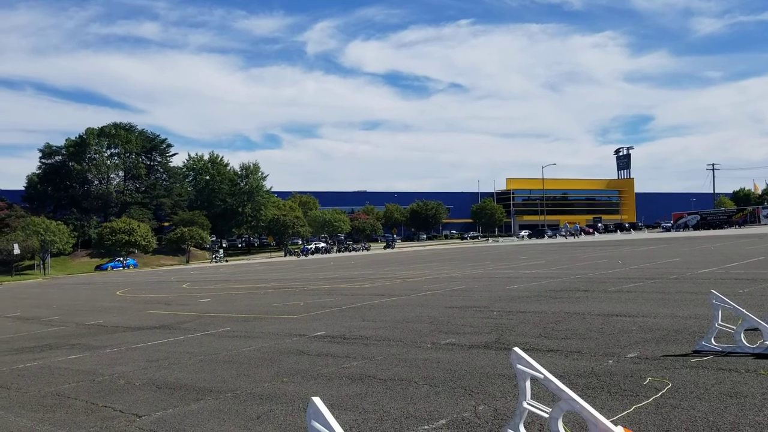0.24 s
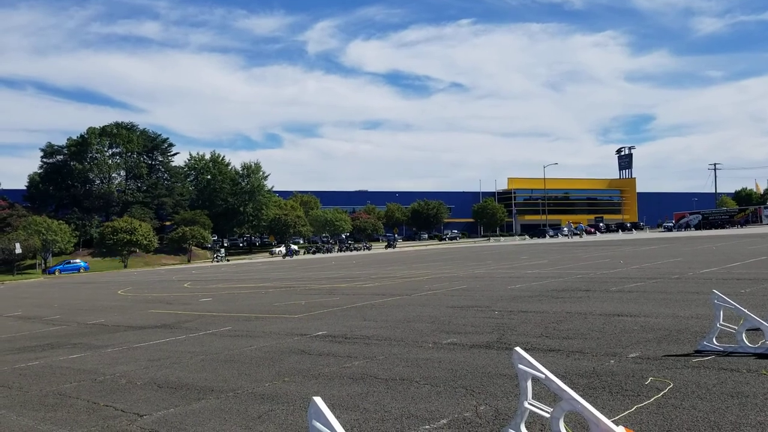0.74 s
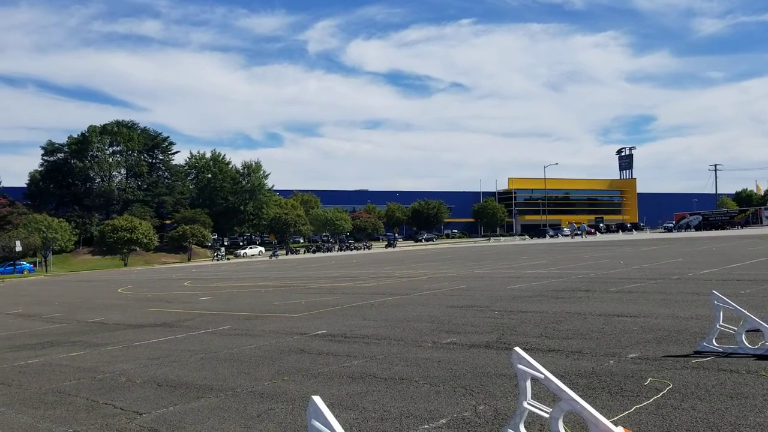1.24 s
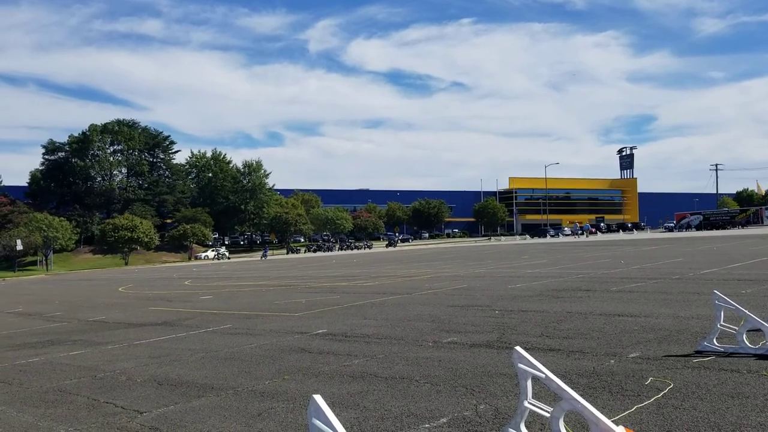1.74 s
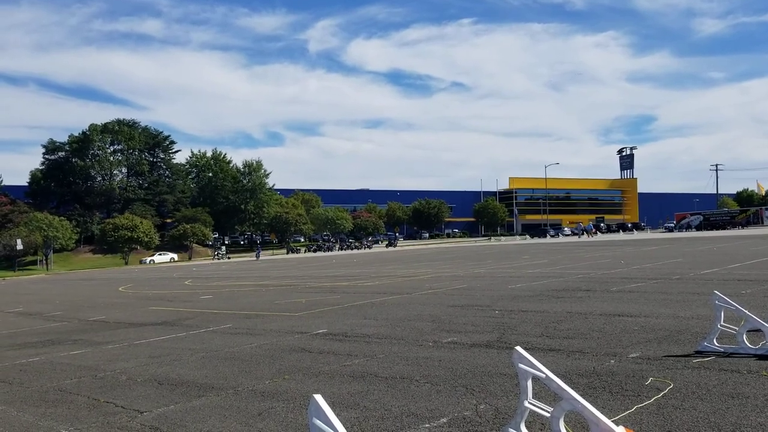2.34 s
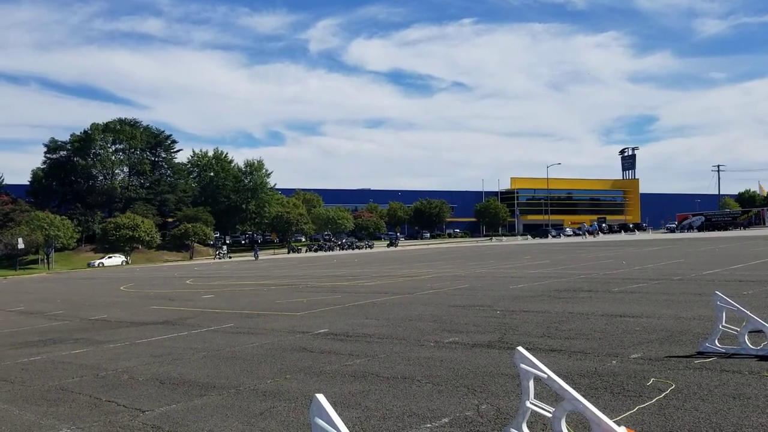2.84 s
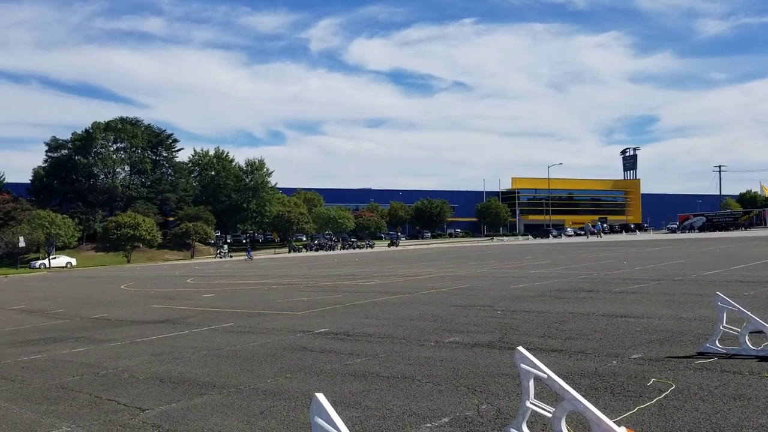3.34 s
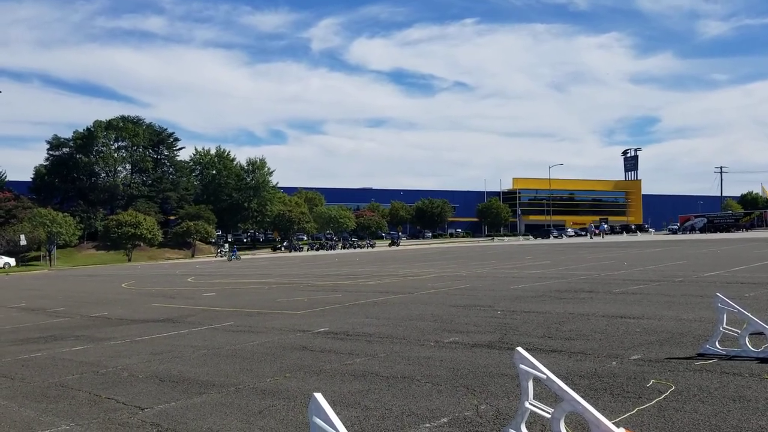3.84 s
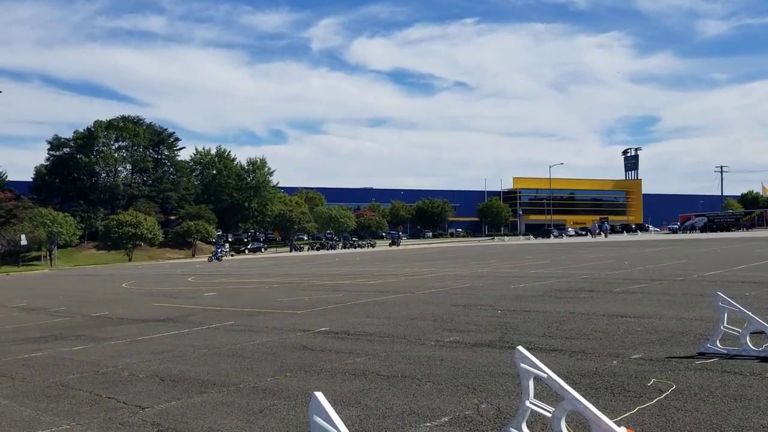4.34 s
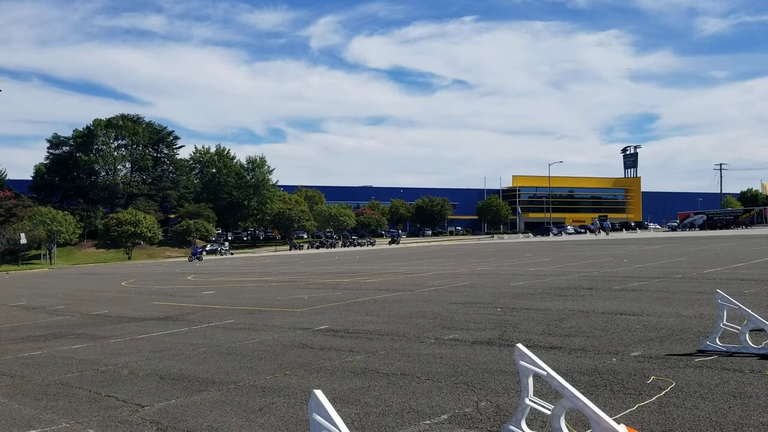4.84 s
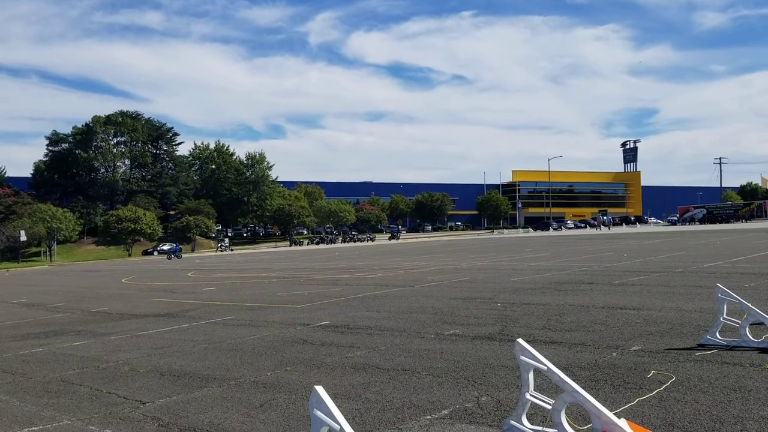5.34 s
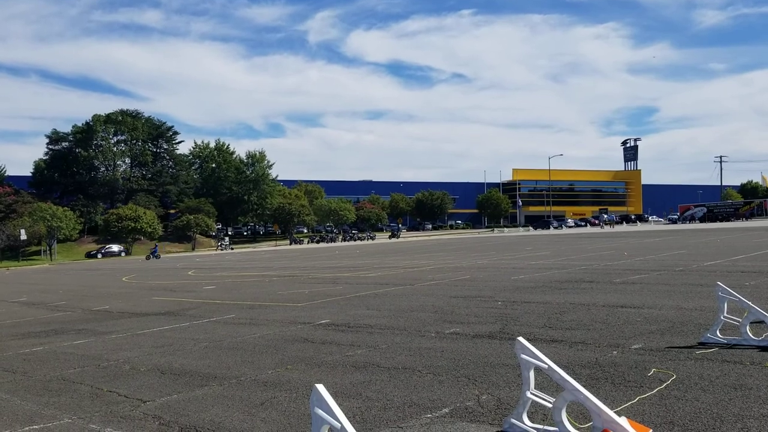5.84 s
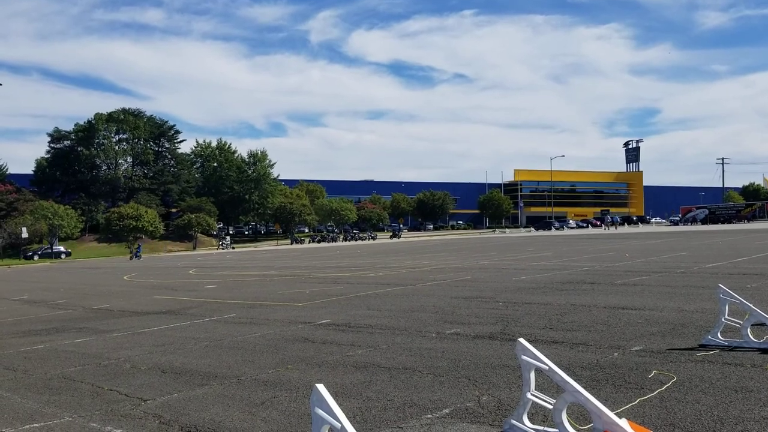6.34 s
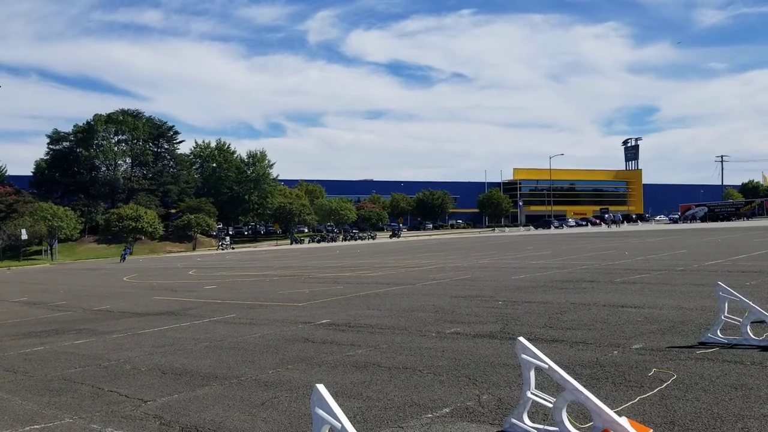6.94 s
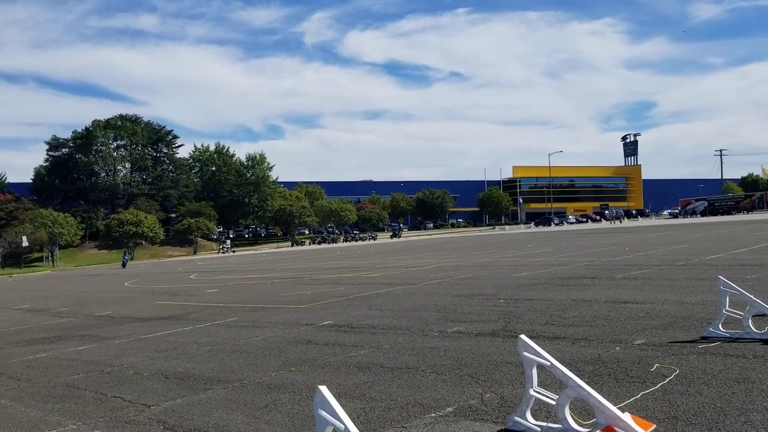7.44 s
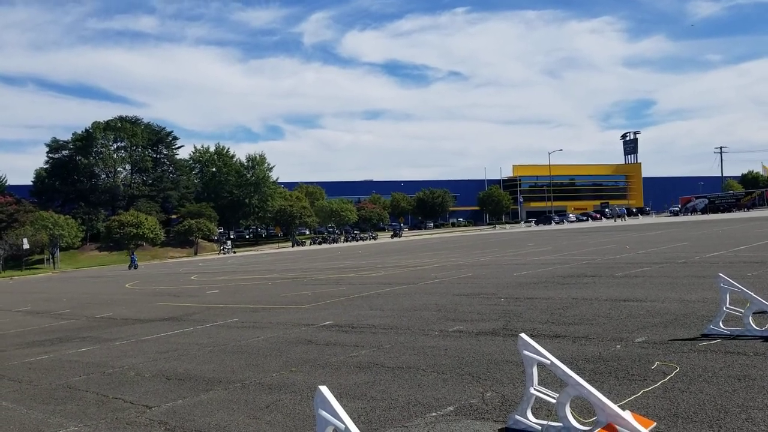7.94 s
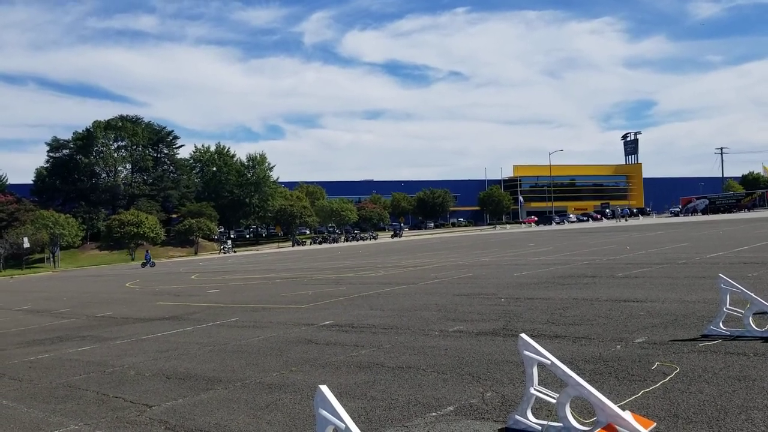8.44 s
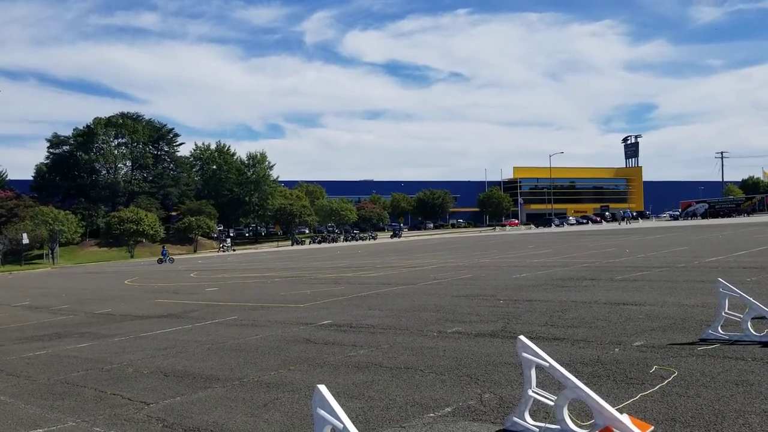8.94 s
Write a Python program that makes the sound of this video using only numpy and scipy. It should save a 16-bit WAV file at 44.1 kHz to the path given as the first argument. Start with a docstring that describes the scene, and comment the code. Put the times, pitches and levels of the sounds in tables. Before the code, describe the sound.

An open parking lot heard from far across the asphalt, in stereo, with engines slightly left of centre. From 0 to 2 seconds a car rolls by with soft tyre hiss, brighter on the right, and a faint sinking engine note, while the left is heavy with bass; a short wind bump comes at 0.7. Throughout, one motorcycle drones very low and muffled and another holds a steady higher hum, both wavering. Around 2.2 the opening weight drops away and a far bike revs briefly, rising and fading. From about 4 the uneven idling putter grows, with hard dull thumps clustered at 4.3 to 5.1 and more between 5.8 and 7.6. Wind rumble thickens after 4. From 7.9 a louder low engine swells in, its pitch gliding down until the cut at about 9.2. Distant traffic roar, faint leaves and thin high hiss continue underneath.

```python
"""Motorcycles around a big open car park, over filtered-noise traffic, leaves, hiss and microphone wind.
From the start one bike holds a steady throttle and one drones low, both as sums of engine orders, while twins
idle as beats ringing a pipe. A car rolls past with a soft note and tyre hiss; the left is bass-heavy.
After two seconds that opening ends and a far bike revs briefly. The idling twins then thump harder,
and near the end a louder bike comes in, its note sinking as it eases off."""
import sys
import numpy as np
from scipy import signal
from scipy.fft import rfft, irfft, next_fast_len
from scipy.io import wavfile
from scipy.ndimage import uniform_filter1d, map_coordinates

SR = 44100
rng = np.random.default_rng(int(sys.argv[2]) if len(sys.argv) > 2 else 0)


def bounce(signal):
    """Save signal as a 16-bit WAV file at the path given by the first command-line argument."""
    frames = np.transpose(np.atleast_2d(signal))
    limited = np.clip(frames, -1, 1)
    pcm = np.round(limited * 32767).astype(np.int16)
    wavfile.write(sys.argv[1], SR, pcm)


N = 405279  # length [samples]

# Wind on the microphone: steady level (time [s], level [dB])
WIND_LEVEL = [(0, -54.5), (2.6, -61), (3.6, -52.5), (5.5, -44), (7.2, -44.5), (9.19, -45.5)]
# Wind rumble colour (frequency [Hz], density [dB per Hz])
RUMBLE_COLOUR = [(12, -11.5), (28, -0.5), (50, 2.5), (80, -0.5), (140, -10), (300, -31), (800, -68.5)]
# Gusts (time [s], bell width [s], level on the microphone [dB], level in the leaves [dB])
GUST_EVENTS = [(.66, 0.052, -46.5, -88.5), (4.5, .09, -50, -82), (6.47, 0.076, -63, -83),
               (7.1, .11, -58, -77)]
# Leaf colour (frequency [Hz], density [dB per Hz])
LEAF_COLOUR = [(1500, -8), (4000, 0), (6000, 0), (7800, -16), (11000, -3), (15500, -9.5)]
# Fine high sizzle (time [s], level [dB])
SIZZLE_LEVEL = [(0, -73), (3, -75.5), (4.5, -73.5), (7, -73), (9.19, -72.5)]
# Sizzle colour (frequency [Hz], density [dB per Hz])
SIZZLE_SPECTRUM = [(4000, -19.5), (7600, -29.5), (9000, -9), (10800, 0), (13000, -1), (15600, -3)]
# Brief high rustles (time [s], level [dB], bell width [s])
RUSTLE_EVENTS = [(0.779, -71.5, .07), (0.97, -80.5, 0.033), (1.683, -84.5, 0.13), (3.424, -81, .08),
                 (8.753, -79, .12)]
# Rustle colour (frequency [Hz], density [dB per Hz])
RUSTLE_COLOUR = [(9800, -36.5), (11200, 1.5), (12000, 2.5), (12700, -13), (13800, -26.0)]
# Thin hiss on the right, before its trim (time [s], level [dB])
THIN_LEVEL = [(0, -83.5), (2.4, -85), (3.2, -72), (7.4, -66.5), (9.19, -66)]
# Thin hiss colour (frequency [Hz], density [dB per Hz])
THIN_SPECTRUM = [(1500, -18), (2300, 7.5), (2900, -2.5), (3700, 1), (4500, -9), (5000, -20), (7000, -44.5)]
# Far traffic roar (time [s], level [dB])
ROAR_LEVEL = [(0, -42.5), (3.8, -43.5), (4.8, -40), (5.3, -42.5), (6.3, -40.5), (7.8, -46), (9.19, -45)]
# Tyre roar colour (frequency [Hz], density [dB per Hz])
TYRE_COLOUR = [(40, -9), (120, -5.5), (330, 6), (520, -1.5), (900, 4.5), (1150, 3.5), (1400, -3.5),
               (1700, -7.5), (2000, -14), (2400, -21), (3000, -31), (4200, -32), (5000, -48), (7500, -52)]
# Brighter traffic hiss against the roar (time [s], relative level [dB])
HISS_RE_ROAR = [(2.3, -32), (3.8, -21.5), (4.6, -18.5), (5.5, -19.5), (6.8, -24), (7.6, -11), (9.19, -18)]
# Colour of that hiss (frequency [Hz], density [dB per Hz])
HISS_SPECTRUM = [(500, -34), (1100, -6.5), (1650, 6.5), (2200, -5), (3000, -16.5), (4400, -36), (5200, -51),
                 (8000, -62.5)]
# Tyres of the car driving past (time [s], level [dB])
CAR_TYRE_LEVEL = [(0, -49.5), (.9, -50.5), (1.6, -54), (1.88, -50)]
# Orders of the short rev (multiple of the cycle rate [-], level [dB])
REV_ORDER_LEVELS = [(5, -18), (6, -8), (7, 1.5), (8, -11), (9, -13)]
# Idling twins, before each layer's trim (time [s], level [dB])
IDLE_LEVEL = [(0, -50.5), (2.3, -51), (4, -44.5), (4.4, -41), (5.5, -41), (6.4, -40.5), (7.4, -37.5),
              (9.19, -37)]
# Exhaust pipe colour of the twins (frequency [Hz], density [dB per Hz])
PIPE_COLOUR = [(18, -20.5), (35, -17), (55, 0), (75, -4.5), (115, -4), (155, -8.5), (200, -8.5), (260, -12),
               (380, -15), (480, -21), (900, -22), (1600, -30), (3500, -54), (7000, -90.5)]
# Hardest exhaust beats, before their trim (time [s], peak level [dB])
THUMP_EVENTS = [(4.297, -24.5), (4.356, -21), (4.392, -23.5), (4.449, -25), (4.643, -20), (4.778, -25.5),
                (5.02, -24.5), (5.1, -24.5), (5.841, -29.5), (6.029, -27), (6.282, -23.5), (6.399, -24.5),
                (6.862, -25), (7.583, -24)]
# Droning bike, strength (time [s], level [dB])
DRONE_LEVEL = [(0, -44.5), (.8, -40.5), (1.2, -46.5), (1.6, -41.5), (2.15, -44), (2.7, -40.5), (3.6, -39),
               (5.2, -46), (5.8, -35.5), (6.6, -41), (7.55, -34), (8.2, -40), (8.8, -33.5), (9.19, -35)]
# Droning bike, settling to its idle (time [s], firing rate [Hz])
DRONE_PITCH = [(0, 94.2), (1.6, 87.6), (5.5, 89.2), (9.19, 88.6)]
# Steady bike, strength of its firing note (time [s], level [dB])
CRUISE_LEVEL = [(0, -47), (.5, -50), (.92, -58), (1.15, -48), (2.4, -47), (2.85, -39.5), (3.35, -45),
                (4.35, -36), (4.7, -42), (5.1, -35), (6.2, -41), (6.8, -37.5), (7.7, -34), (8.3, -43.5),
                (9.19, -47)]
# Steady bike, speed sinking and levelling out (time [s], firing note [Hz])
CRUISE_PITCH = [(0, 146.5), (2.1, 143.5), (3.2, 140.5), (5.3, 139.3), (9.19, 139)]
# Its weaker orders (multiple of the cycle rate [-], level against the firing note [dB])
CRUISE_ORDERS = [(3, -16), (10, -25), (11, -17), (13, -20), (14, -17), (21, -20.5), (22, -26.5), (24, -20)]
# Its octave (time [s], level [dB])
OCTAVE_LEVEL = [(0, -63), (.4, -53.5), (3, -50), (5.3, -46.5), (8.2, -41), (9, -56.5)]
# Its higher pipe note (time [s], level [dB])
PIPE_NOTE_LEVEL = [(0, -53.5), (3.6, -56.5), (4.1, -50.5), (5.5, -45), (6.2, -49.5), (9.19, -54.5)]
# Moments when the engines' bass drops away (time [s], depth [dB], bell width [s])
BASS_LULLS = [(1.78, -4.5, 0.026), (2.1, -3.5, .06), (3.13, -7, 0.011), (4.19, -7, 0.021),
              (4.601, -7, .015), (4.755, -8.5, 0.013), (5.57, -10, 0.031), (6.12, -8, .035),
              (6.61, -6.5, .045), (7.2, -3, 0.089), (7.94, -7.5, .025), (9.08, -3.5, .04)]
# Microphone low cut (frequency [Hz], gain [dB])
LOW_CUT_CURVE = [(10, -21.5), (25, -5.5), (42, 2), (150, 2), (300, 0.5)]
# The two microphone ports (frequency [Hz], left minus right [dB])
PORT_BALANCE = [(25, 0), (90, 0), (380, -2), (700, -1.5), (1290, -3.5), (2380, -4.5), (4400, -10),
                (5200, -3), (7600, 2), (9400, 13), (11500, 5.5), (15000, -2.5)]
# Left channel's bass lift during the opening (frequency [Hz], gain [dB])
OPENING_BASS_LIFT = [(25, 13.5), (60, 16), (148, 16.5), (180, 11), (290, 4), (390, -0.5)]

SOUND_SPEED = 343  # [m/s]
TOP_HZ = 15719  # upper band limit
# The left's heavy bass, the car's hiss and its engine end together
OPENING_END_S, OPENING_FADE_S = 2.01, .04
# Leaves: base level, and dB gained for each dB of wind
LEAVES_DB, LEAVES_FOLLOW = -84, .25
# Passing car: firing pitch at the start, its even fall, engine level
CAR_HZ, CAR_SAG_HZ_PER_S, CAR_ENGINE_DB = 118, 5, -59.5
# Short rev: loudest moment, engine cycle rate then, its climb, level, bell width
REV_S, REV_HZ, REV_CLIMB_HZ_PER_S, REV_DB, REV_WIDTH_S = 2.18, 52, 14.3, -42.5, 0.22
# Easing bike: start, time to full strength, first pitch, its fall, level
EASE_START_S, EASE_ATTACK_S, EASE_HZ, EASE_SAG_HZ_PER_S, EASE_DB = 7.88, .56, 148.2, 15.9, -27.5
# Flutter of the engines' bass: depth, and random knots per second
FLUTTER_DB, FLUTTER_RATE = 1.3, 15


def amp(db):
    """Decibels to gain."""
    return 10 ** (np.asarray(db) / 20)


def unit(x):
    """x at rms 1."""
    return x / np.sqrt(np.mean(x ** 2) + 1e-20)


def along(points, hz):
    """(Hz, value) points read on a log axis."""
    f, v = np.transpose(points)
    return np.interp(np.log(hz + 1), np.log(f + 1), v)


def curves(rows):
    """One value per sample for each column after the time."""
    s, *cols = np.transpose(rows)
    return [np.interp(np.arange(N) / SR, s, c) for c in cols]


def wobble(rate):
    """A smooth random curve of rms 1, rate knots a second."""
    knots = rng.standard_normal(int(N * rate / SR) + 4)
    return unit(map_coordinates(knots, [np.arange(N) * rate / SR]))


def swell(s, width):
    """A bell of height 1 around the moment s."""
    return np.exp(-.5 * ((np.arange(N) / SR - s) / width) ** 2)


def opening():
    """1 during the first two seconds, then quickly 0."""
    return np.clip((OPENING_END_S - np.arange(N) / SR) / OPENING_FADE_S, 0, 1)


def filtered(x, response):
    """x shaped by a complex response of frequency."""
    m = next_fast_len(N + SR // 2)
    return irfft(rfft(x, m) * response(np.fft.rfftfreq(m, 1 / SR)), m)[..., :N]


def ringing(spectrum, size=8192):
    """The causal, minimum-phase impulse response of a spectrum, by folding its cepstrum."""
    cepstrum = irfft(np.log(amp(along(spectrum, np.fft.rfftfreq(size, 1 / SR)))))
    cepstrum[1:size // 2] *= 2
    cepstrum[size // 2 + 1:] = 0
    return irfft(np.exp(rfft(cepstrum)))


def arrive(x, lag_ms=0.41):
    """Sound from one direction, slightly to the left, reaches the left port a little earlier."""
    return filtered(x, lambda hz: np.exp(np.outer([1, -1], 1j * np.pi * hz * lag_ms / 10 ** 3)))


def wash(spectrum, diffuse_db, spacing=0.12):
    """Stereo noise of rms 1: one part from one direction, one part from all around."""
    def mid_side_gains(hz):
        # long waves from all around are alike at ports a few centimetres apart
        turn = np.arccos(np.sinc(2 * hz * spacing / SOUND_SPEED)) / 2
        return np.array([np.cos(turn), np.sin(turn)])
    mid, side = filtered(rng.standard_normal((2, N)), mid_side_gains)
    directed = arrive(rng.standard_normal(N))
    pair = directed + amp(diffuse_db) * np.array([mid + side, mid - side])
    return unit(filtered(pair, lambda hz: amp(along(spectrum, hz))))


def patchy(x, depth_db):
    """Moving air makes patches of noise come and go."""
    z = signal.stft(x, nperseg=1024)[2]
    field = rng.standard_normal(z.shape[1:])
    field = uniform_filter1d(field, 6, 0)  # smooth over frequency
    field = uniform_filter1d(field, 10, 1)  # then over time
    return unit(signal.istft(z * amp(depth_db * unit(field)), nperseg=1024)[1][:, :N])


def scattered(x, t60, wet_db):
    """Trees and the long store front return a diffuse tail, different at each port."""
    t = np.arange(SR // 2) / SR
    tail = rng.standard_normal((2, len(t))) * amp(-60 * t / t60)
    tail = tail / np.linalg.norm(tail[0])
    return amp(wet_db) * signal.fftconvolve(x[None], tail, axes=1)[:, :N]


def throbbing(x, below_hz=240):
    """The bass flutters and now and then drops away, while the overtones carry on."""
    lulls_db = sum(db * swell(s, width) for s, db, width in BASS_LULLS)
    throb_db = FLUTTER_DB * wobble(FLUTTER_RATE) + lulls_db
    bass = filtered(x, lambda hz: 1 / (1 + (hz / below_hz) ** 6))
    return x + (amp(throb_db) - 1) * bass


def crank(hz, unsteady):
    """Running phase of an engine whose speed hunts slightly."""
    return 2 * np.pi * np.cumsum(hz) / SR + unsteady * wobble(12)


def exhaust_note(phase, orders, fade_db, rough):
    """Engine orders; each fades on its own in the moving air and flutters with uneven firing."""
    note = 0
    for k, db in orders:
        fade = amp(db + fade_db * wobble(6))
        tone = np.sin(round(k) * phase + rough * wobble(35) + rng.uniform(0, 2 * np.pi))
        note = note + fade * tone * (1 + rough * wobble(35))
    return note


def wind():
    """Eddies buffet each microphone port separately, harder in the gusts."""
    wind_db, = curves(WIND_LEVEL)
    gusts = sum(amp(db) * swell(s, width) for s, width, db, _ in GUST_EVENTS)
    eddies = amp(4 * np.array([wobble(9), wobble(9)]))
    rumble = filtered(rng.standard_normal((2, N)), lambda hz: amp(along(RUMBLE_COLOUR, hz)))
    return (amp(wind_db) + gusts) * unit(eddies * rumble)


def breeze():
    """Leaves follow the wind and stir in the gusts, under a fine sizzle with a few brief rustles."""
    wind_db, sizzle_db = curves(WIND_LEVEL) + curves(SIZZLE_LEVEL)
    stir = amp(LEAVES_DB + LEAVES_FOLLOW * (wind_db - wind_db.mean()))
    stir = stir + sum(amp(db) * swell(s, width) for s, width, _, db in GUST_EVENTS)
    leaves = stir * wash(LEAF_COLOUR, diffuse_db=5)
    sizzle = amp(sizzle_db) * wash(SIZZLE_SPECTRUM, diffuse_db=13.5)
    swells = sum(amp(db) * swell(s, width) for s, db, width in RUSTLE_EVENTS)
    rustle = swells * amp(2.5 * wobble(40)) * wash(RUSTLE_COLOUR, diffuse_db=3)
    return leaves + sizzle + rustle


def thin_hiss():
    """A faint noise band to the right, much stronger later on than at first."""
    db, = curves(THIN_LEVEL)
    return amp(db - 1.5) * wash(THIN_SPECTRUM, diffuse_db=4) * amp([[-10], [0]])


def traffic():
    """Tyre roar of far roads, with a brighter hiss to the right that is strongest while a car drives past."""
    roar_db, under_db, car_db = curves(ROAR_LEVEL) + curves(HISS_RE_ROAR) + curves(CAR_TYRE_LEVEL)
    roar = amp(roar_db + 0.61 * wobble(8)) * patchy(wash(TYRE_COLOUR, diffuse_db=-5.0), depth_db=1.27)
    # far hiss and car hiss add as powers
    hiss_gain = np.hypot(amp(roar_db + under_db), opening() * amp(car_db))
    hiss = hiss_gain * patchy(wash(HISS_SPECTRUM, diffuse_db=-1), depth_db=2.5)
    return roar + hiss * amp([[-8], [0]])


def passing_car():
    """The soft engine note of a car rolling by during the opening, slowing evenly."""
    phase = crank(CAR_HZ - CAR_SAG_HZ_PER_S * np.arange(N) / SR, unsteady=0.1)
    note = exhaust_note(phase, [(1, -2), (2, -14.5)], fade_db=6, rough=0.2)
    return amp(CAR_ENGINE_DB) * opening() * note


def revving_bike():
    """A short rev climbs evenly in pitch while it swells and fades."""
    hz = REV_HZ + REV_CLIMB_HZ_PER_S * (np.arange(N) / SR - REV_S)
    phase = crank(hz, unsteady=.025)
    note = exhaust_note(phase, REV_ORDER_LEVELS, fade_db=3.5, rough=0.18)
    return amp(REV_DB) * swell(REV_S, REV_WIDTH_S) * note


def twin(cycle_hz, scatter_db, hunt=.05, second_firing=.44):
    """A V-twin fires twice a cycle, unevenly spaced, each beat with its own strength."""
    turns = np.cumsum(cycle_hz * (1 + hunt * wobble(5))) / SR + rng.uniform()
    beats = 0
    for offset in (0, second_firing):
        cycles = np.floor(turns + offset)
        beats = beats + np.diff(cycles, prepend=cycles[0])
    return beats * amp(scatter_db * rng.standard_normal(N))


def idling_twins():
    """Twins beat against each other; every beat pushes a puff of gas through the pipe."""
    level_db, = curves(IDLE_LEVEL)
    beats = twin(13.6, scatter_db=2.2) + twin(17.3, scatter_db=1)
    t = np.arange(SR // 10) / SR
    puffs = signal.fftconvolve(beats, amp(-60 * t / 0.11))[:N] * rng.standard_normal(N)
    flow = unit(beats - beats.mean()) + amp(2.0) * unit(puffs)
    putter = amp(level_db - 1.0) * unit(signal.fftconvolve(flow, ringing(PIPE_COLOUR))[:N])
    # the slowest twin lopes: its beats mainly stir the pipe's lowest resonance
    lope = twin(7.2, scatter_db=1.5) * amp(level_db + 3.0)
    for s, db in THUMP_EVENTS:
        lope[round(s * SR)] = amp(db - 2.5)
    boom = np.sin(2 * np.pi * 102 * t) * amp(-60 * t / 0.032) * (1 - np.exp(-t / 0.0041))
    return putter + signal.fftconvolve(lope, boom / np.abs(boom).max())[:N]


def easing_bike():
    """A louder bike comes in and its note sinks evenly as the throttle closes."""
    age = np.arange(N) / SR - EASE_START_S
    phase = crank(EASE_HZ - EASE_SAG_HZ_PER_S * np.maximum(age, 0), unsteady=0.079)
    entry = np.clip(age / EASE_ATTACK_S, 0, 1) ** 1.1
    note = exhaust_note(phase, [(1, -1.5), (2, -33.5), (3, -37)], fade_db=2.9, rough=0.11)
    return entry * amp(EASE_DB) * note


def droning_bike():
    """A muffled exhaust, nearly a pure low note."""
    hz, db = curves(DRONE_PITCH) + curves(DRONE_LEVEL)
    phase = crank(hz, unsteady=.15)
    return amp(db) * exhaust_note(phase, [(1, 0.5), (2, -28)], fade_db=1, rough=.1)


def cruising_bike():
    """A strong firing note with weaker orders of the engine cycle around it."""
    note_hz, = curves(CRUISE_PITCH)
    note_db, octave_db, pipe_db = curves(CRUISE_LEVEL) + curves(OCTAVE_LEVEL) + curves(PIPE_NOTE_LEVEL)
    phase = crank(note_hz / 8, unsteady=.008)  # the firing note is order 8 of the cycle
    note = amp(note_db) * exhaust_note(phase, [(8, 0)] + CRUISE_ORDERS, fade_db=.6, rough=.06)
    octave = amp(octave_db) * exhaust_note(phase, [(16, 0)], fade_db=1.2, rough=.1)
    pipe = amp(pipe_db) * exhaust_note(phase, [(19, 0)], fade_db=1.2, rough=.1)
    return note + octave + pipe


def scene():
    """All the engines come from one direction, slightly to the left, among traffic, hiss, leaves and wind."""
    background = wind() + breeze() + thin_hiss() + traffic()
    notes = passing_car() + revving_bike() + easing_bike() + droning_bike() + cruising_bike()
    twins = idling_twins()
    engines = arrive(notes + twins, lag_ms=0.3) + scattered(twins, t60=0.52, wet_db=-11)
    mix = background + throbbing(engines)
    return mix * signal.windows.tukey(N, .002)  # very short fades at both ends


def record(dry):
    """A low cut; each port has its own colour; the left is bass-heavy at first; nothing passes the band limit."""
    def port_gains(hz):
        return amp(along(LOW_CUT_CURVE, hz) + np.outer([.5, -.5], along(PORT_BALANCE, hz)))
    left, right = filtered(dry, port_gains)
    lift = filtered(left, lambda hz: amp(along(OPENING_BASS_LIFT, hz)) - 1)
    return filtered(np.array([left + opening() * lift, right]), lambda hz: hz < TOP_HZ)


dry = scene()
out = record(dry)
bounce(out)
```